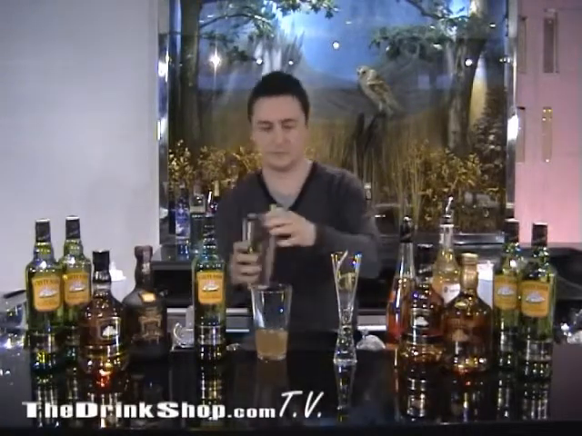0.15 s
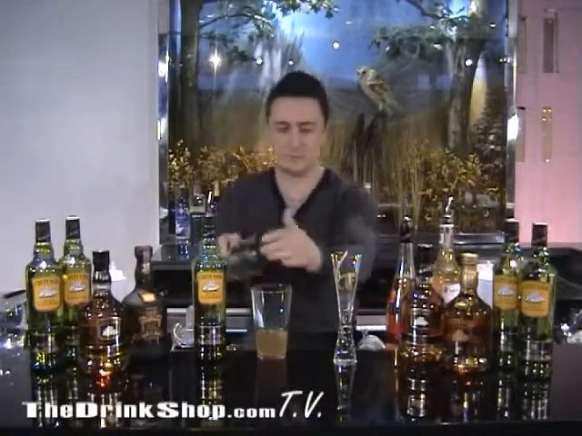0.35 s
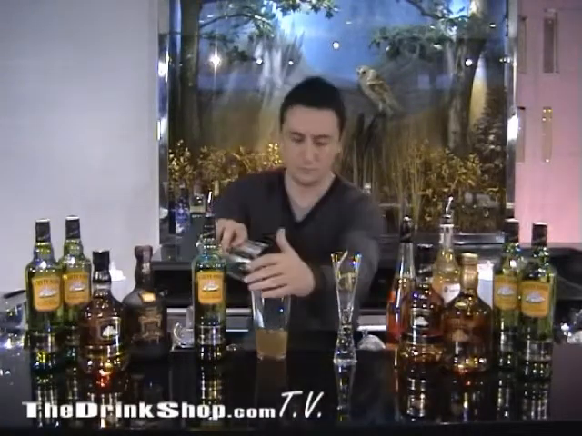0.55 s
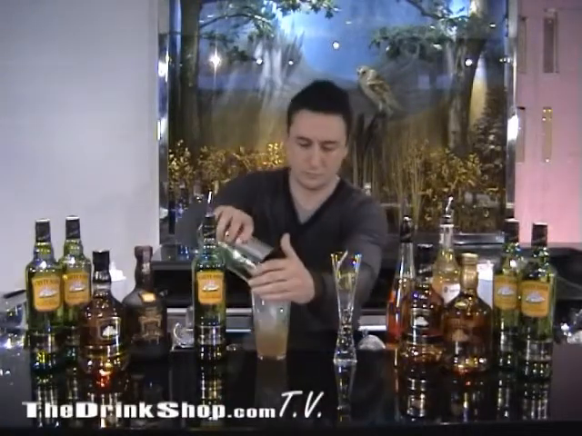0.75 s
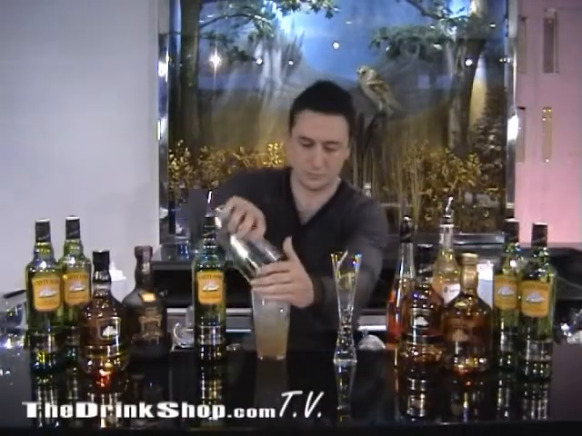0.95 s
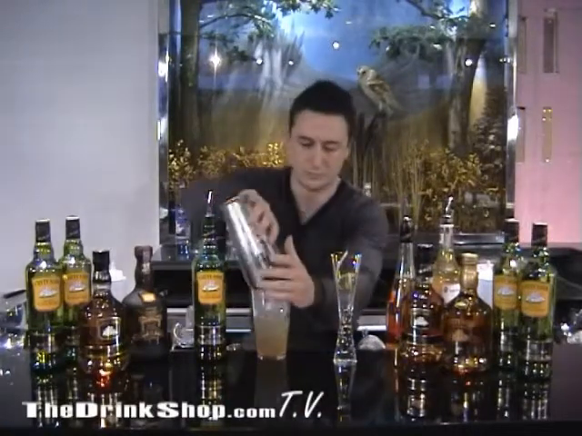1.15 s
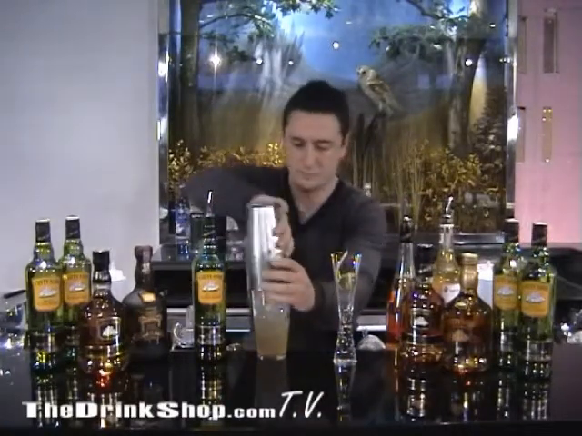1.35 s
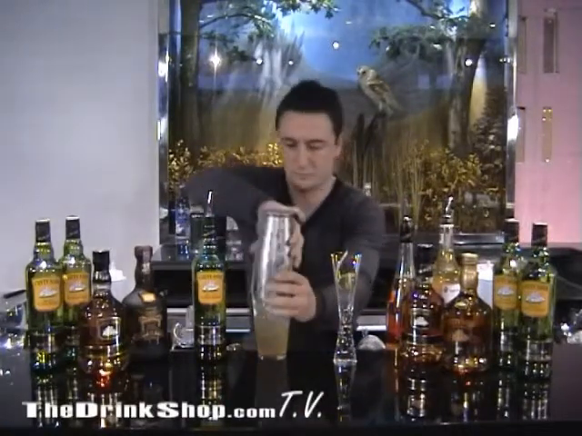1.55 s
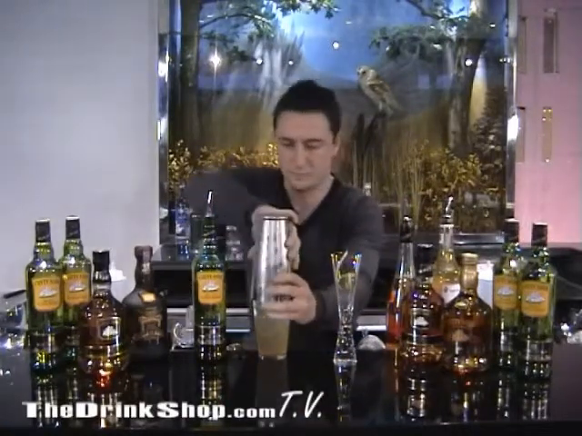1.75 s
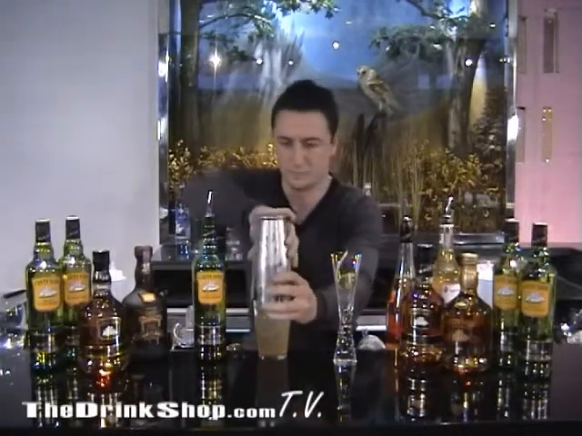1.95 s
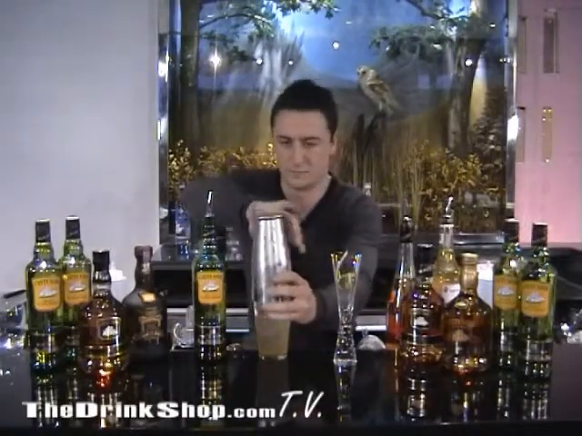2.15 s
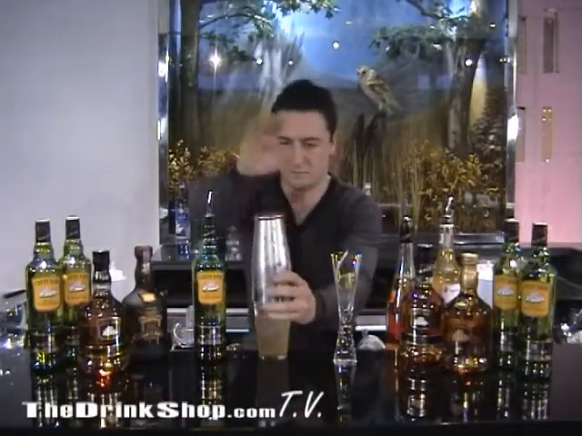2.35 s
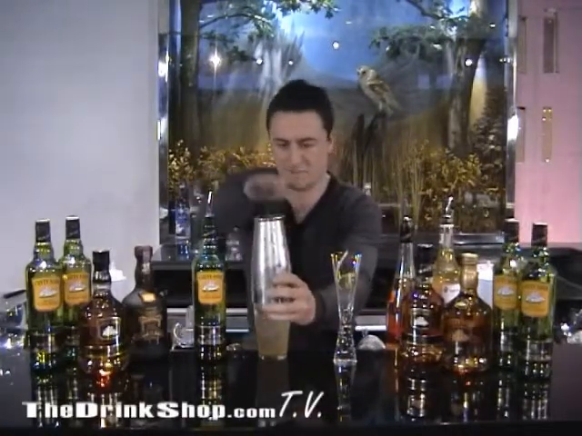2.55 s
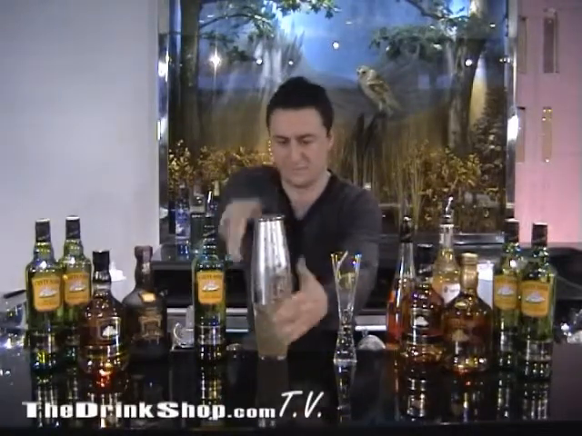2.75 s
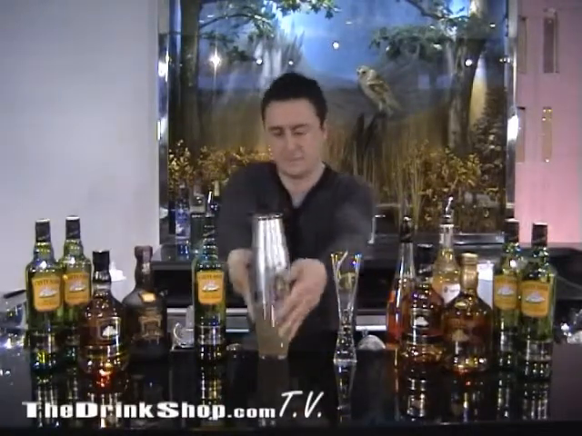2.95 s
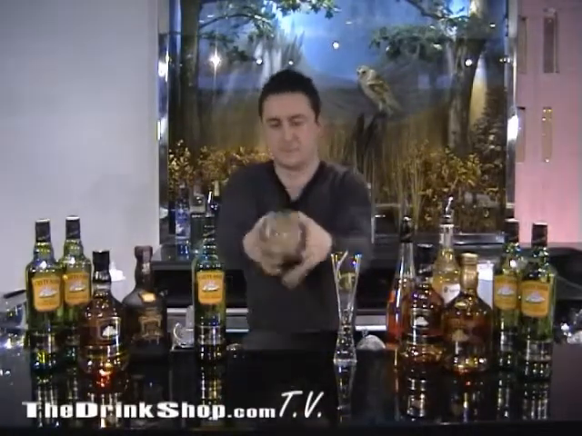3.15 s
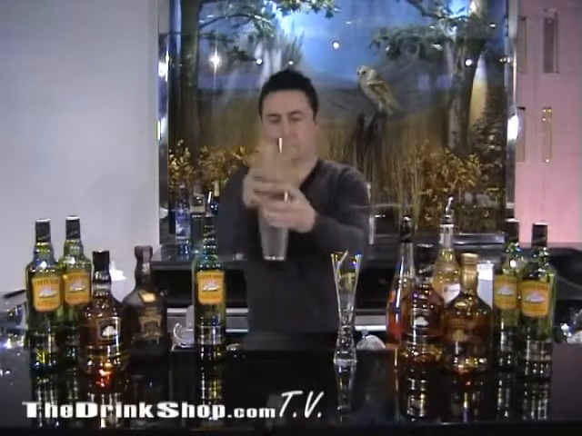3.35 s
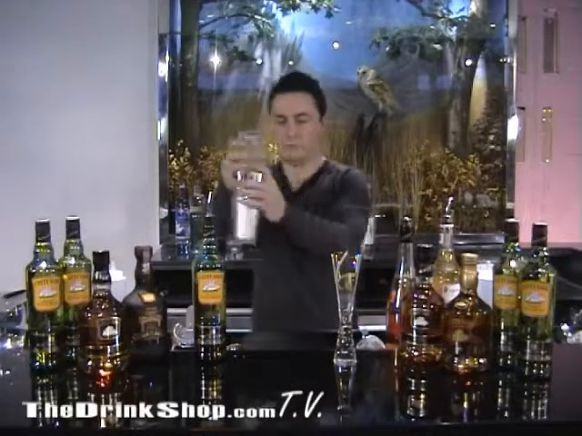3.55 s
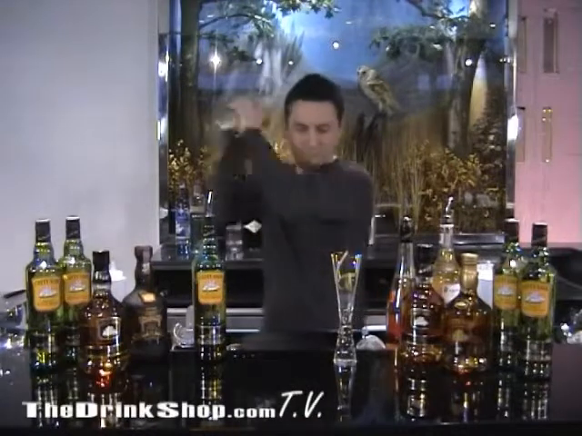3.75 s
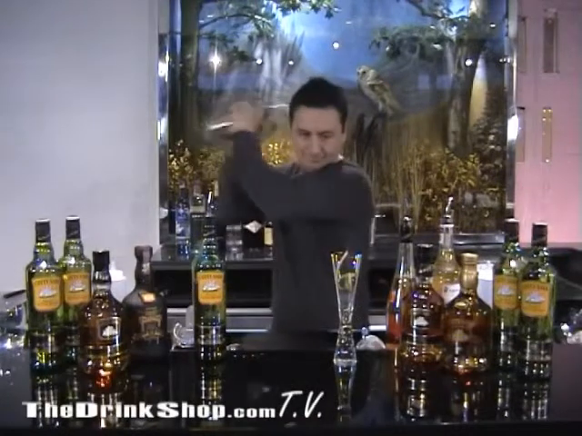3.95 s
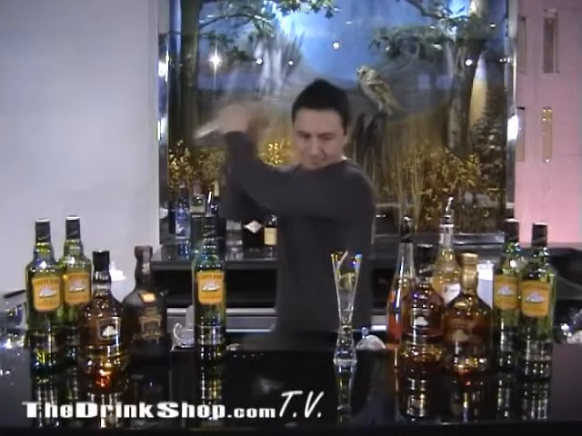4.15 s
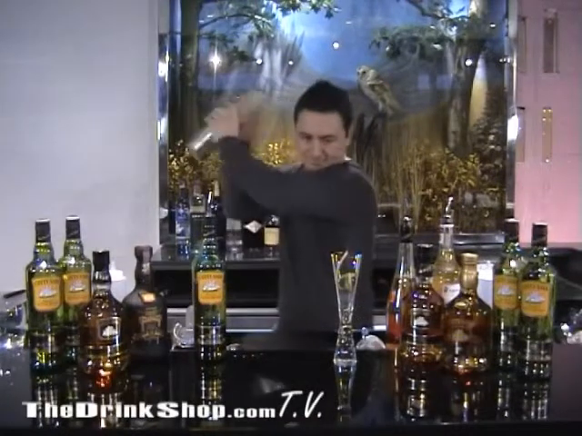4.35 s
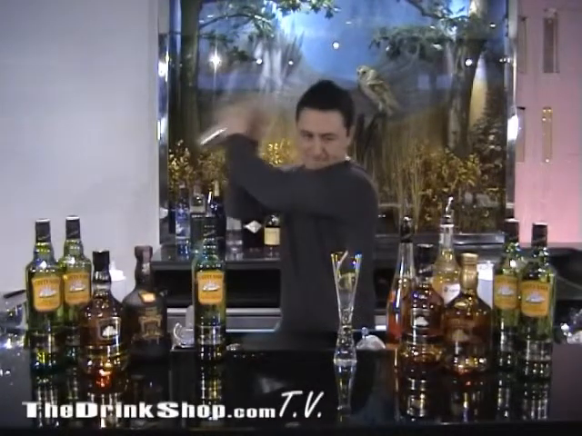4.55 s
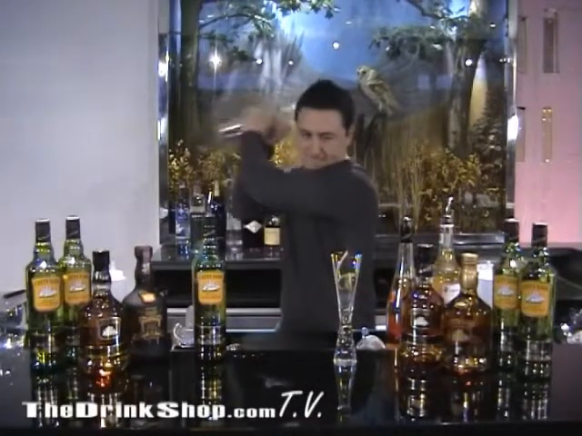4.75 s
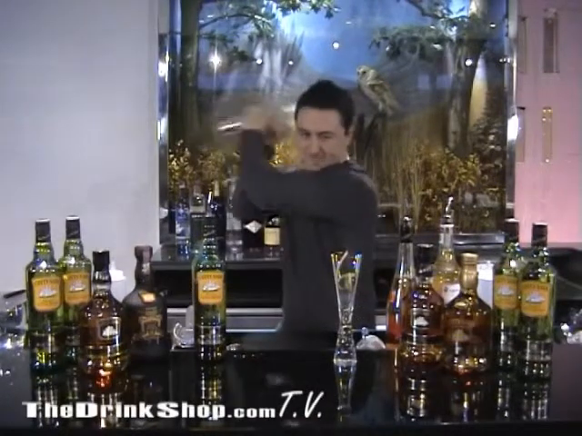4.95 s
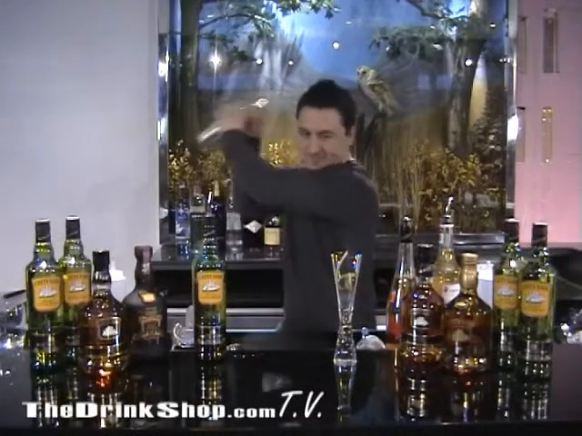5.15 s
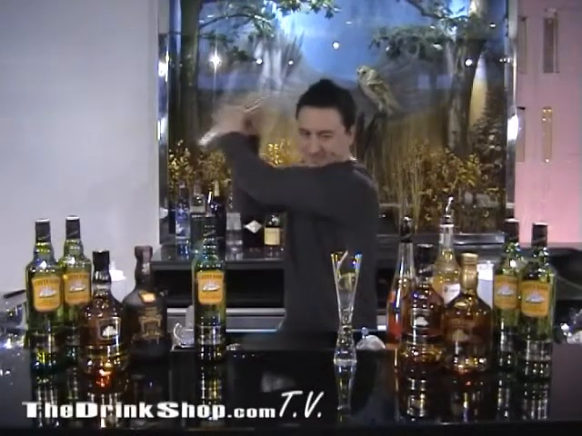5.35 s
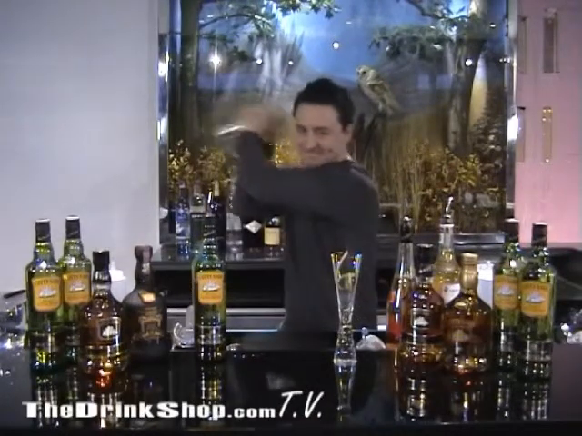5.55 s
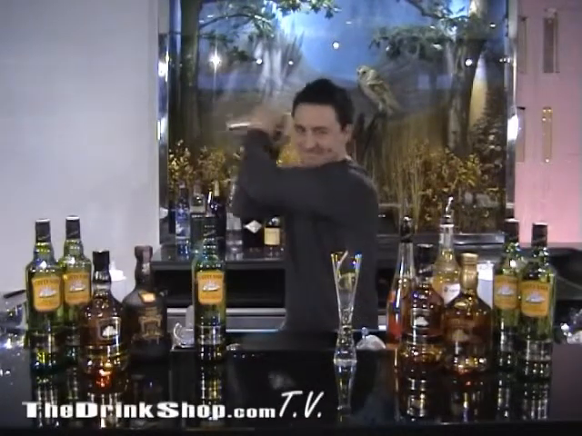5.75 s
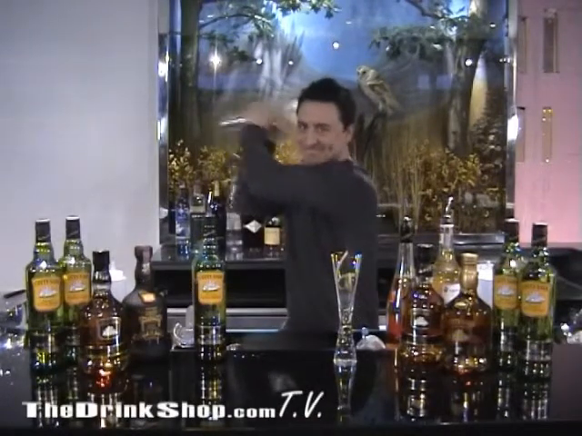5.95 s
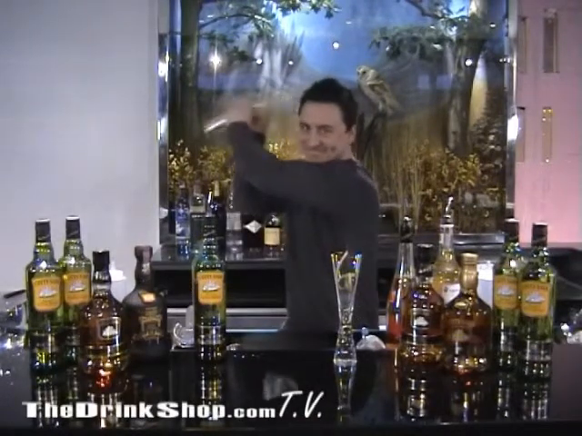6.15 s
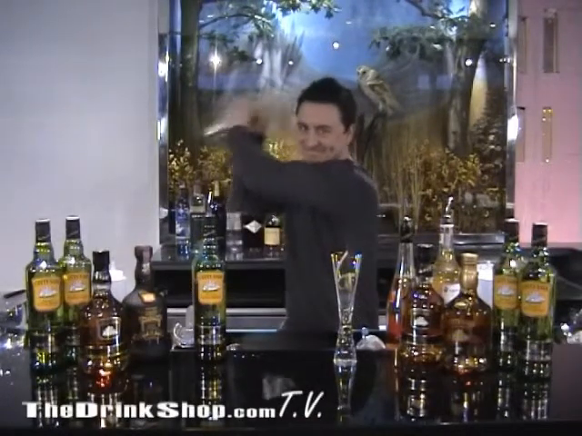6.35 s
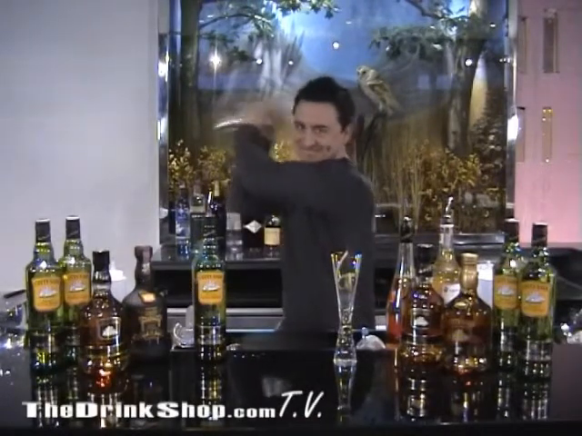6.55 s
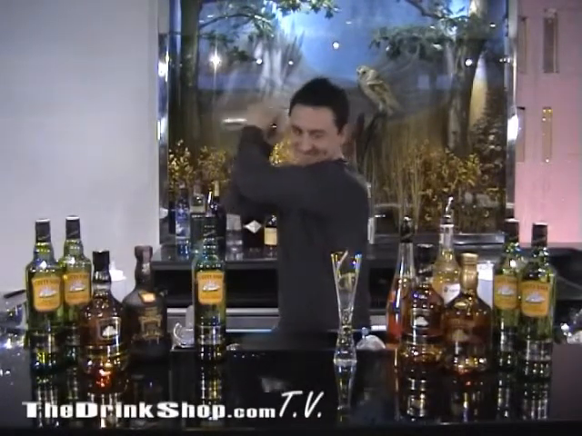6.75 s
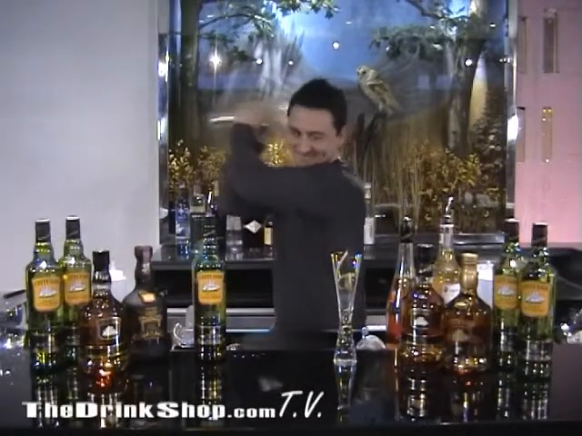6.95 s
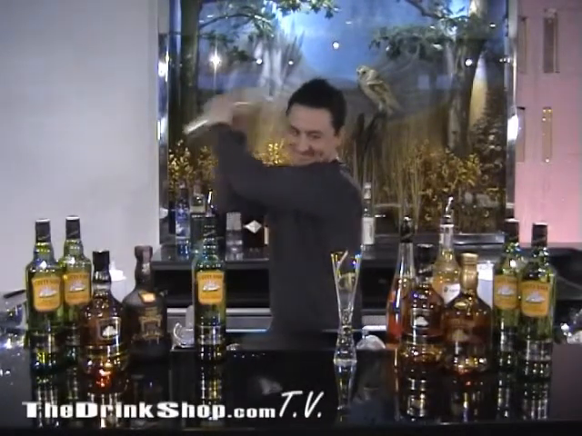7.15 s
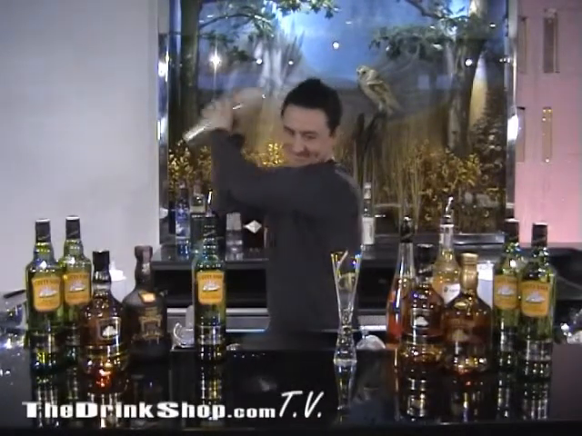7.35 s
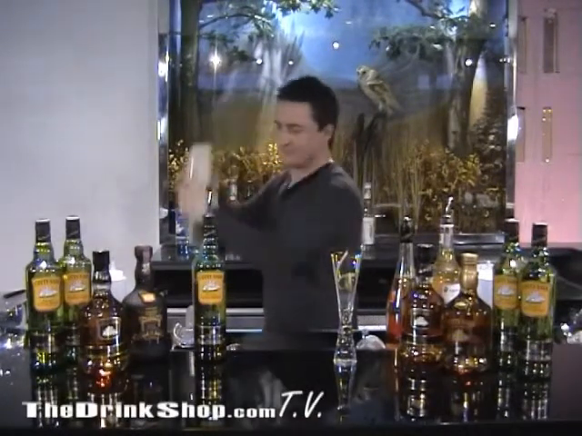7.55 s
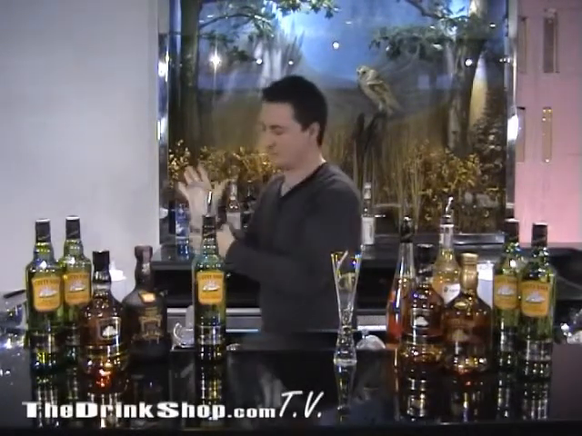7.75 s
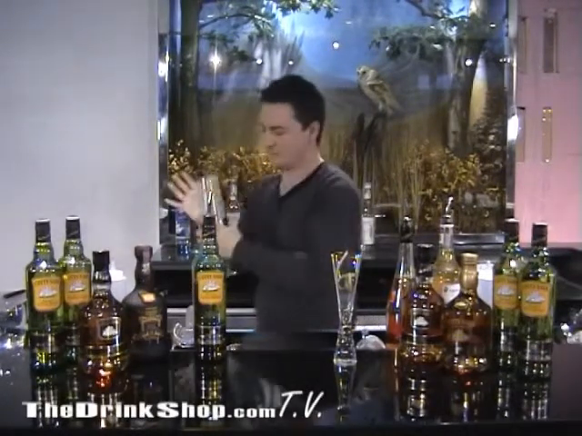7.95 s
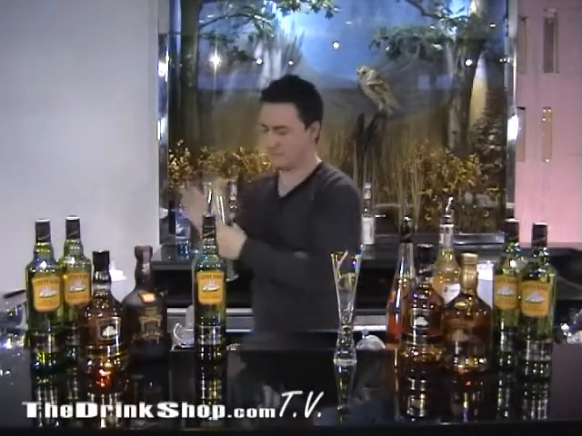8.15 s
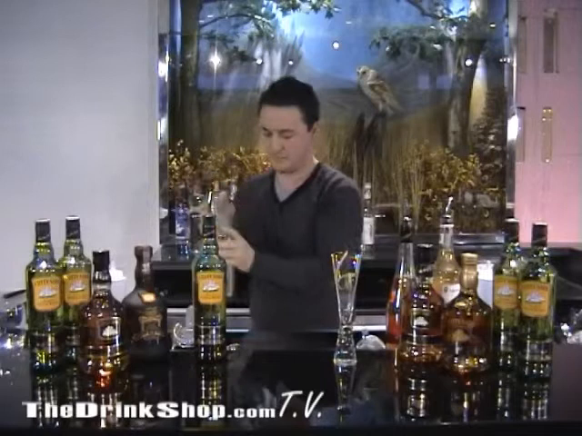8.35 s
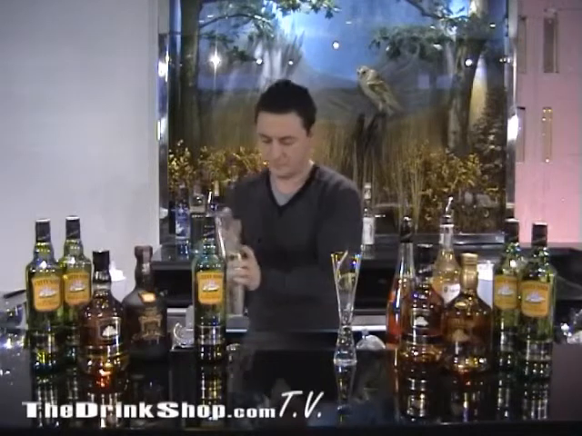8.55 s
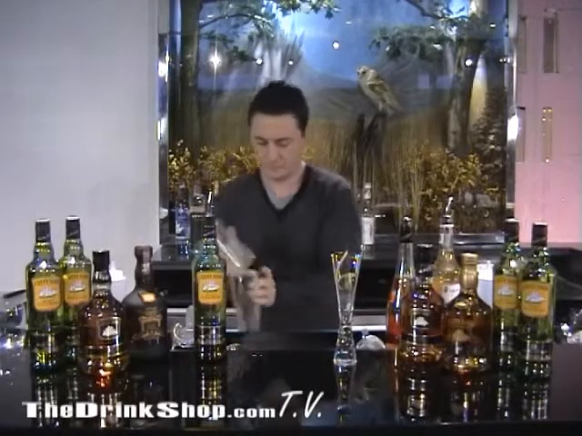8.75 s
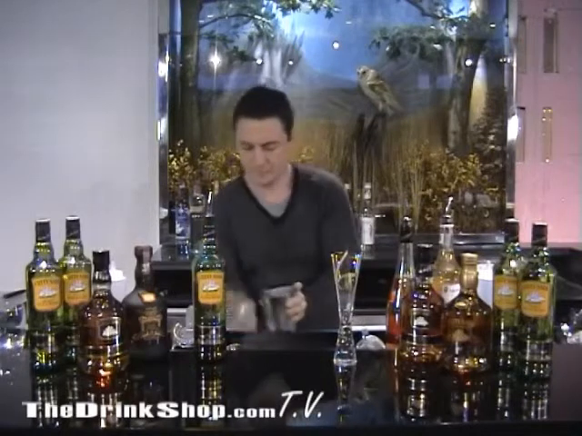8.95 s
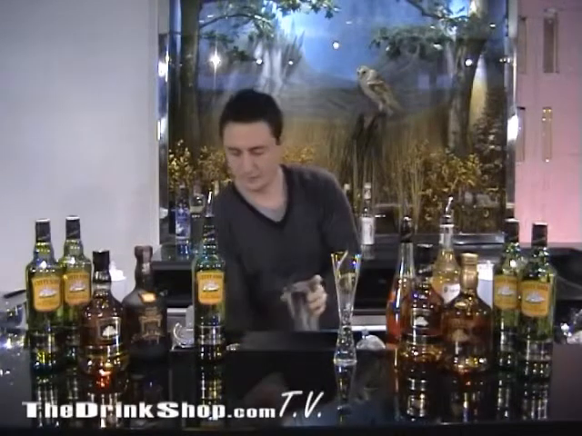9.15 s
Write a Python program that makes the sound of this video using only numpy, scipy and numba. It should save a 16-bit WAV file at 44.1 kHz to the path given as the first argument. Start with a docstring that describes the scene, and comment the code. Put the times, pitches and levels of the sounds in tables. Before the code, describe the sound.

A low ventilation hum fills a bare, reverberant room, picked up closely in stereo. Faint metal scraping leads to light tin-on-glass taps from 0.26 s, with stronger knocks at 0.4 and 0.5. From 0.63 to 1.05 s ice slides out of the open tin in a bright, ringing clatter. Small rim ticks and a glassy touch come at 1.3-1.5, then near quiet until a hard, cracking palm knock at 2.46 booms in the counter. Soft glass bumps at 2.9 and tinkling cubes precede a clattering flip and liquid gulp at 3.4. From 3.9 to 7.4 s fast shaking runs about six strokes a second: crisp ice clacks, dense rattle, wet slosh and hollow metallic ring. A last gulp and rattle come at 7.6, a sharp slap at 7.83 and a softer one at 8.0. Dull handling bumps, faint rubbing and a ringing clink at 8.8 fade into room hum.

```python
"""A steel tin scrapes and knocks on a mixing glass, then a bartender slides ice out of it with a bright clatter.
He seats the tin on the glass, seals it with a knock of the palm and shakes six strokes a second: cubes clack,
the drink sloshes, the closed hollow rings. Slaps loosen the tin and it clinks as it is turned over.
Blows are noise bursts through resonant bodies; rattles and scrapes are crowds of random clicks; liquid, cloth
and ventilation are filtered noise. A bare, echoing room reaches two close-set microphones; the recorder rides the level."""
import sys
import numpy as np
from scipy import signal
from scipy.fft import rfft, irfft
from scipy.io import wavfile
from numba import njit

SR = 44100
rng = np.random.default_rng(int(sys.argv[2]) if len(sys.argv) > 2 else 0)


def master(y):
    """Save y as 16-bit WAV."""
    cut = np.clip(np.atleast_2d(y).T, -1, 1)
    pcm = np.round(cut * 32767)  # scale
    wavfile.write(sys.argv[1], SR, pcm.astype(np.int16))


N = 405719

# All levels in the tables are relative; each layer sets its own gain, and the recorder acts on the sum.

# Strokes landing the load. Each row: time in seconds, slosh in dB, force of the ice in dB, ring of the hollow in dB.
STROKES = [(3.911, -19.5, 3, 5), (4.09, -22.5, 0, 3.5), (4.25, -20.5, 4, 1), (4.421, -23.5, 2, 6),
           (4.584, -28, -2, 1.5), (4.755, -24.5, 1, 4), (4.918, -21, -0.5, -4.5), (5.075, -24, 2, 5.5),
           (5.24, -22.5, -0.5, 0), (5.395, -22, 0.5, 6), (5.559, -24.5, 2.5, -3), (5.742, -19.5, 2, 10),
           (5.907, -21.5, 1.5, -3), (6.072, -19, 2, 1), (6.234, -23.5, -2.5, 0.5), (6.402, -20, 1, -2),
           (6.573, -21.5, 1, 0), (6.739, -22.5, -1, 0), (6.902, -18.5, 0.0, 2), (7.074, -22, 3, -0.5),
           (7.243, -23, 1.5, -3), (7.401, -37, -5, -10)]
# The drink against the wall. Each row: frequency in Hz, level in dB.
SLOSH_BODY = [(40, -29), (140, -24), (350, -5), (650, 2), (1000, 11), (1400, 4.5), (2500, 6.5), (6000, -6),
              (15000, -87)]
# Clumps of cubes standing out of the rattle. Each row: time in seconds, level in dB, brightness in dB per octave,
# ring of the hollow in dB, middle note of the cubes in Hz.
CLACKS = [(3.309, -22, 1, -29, 7360), (3.374, -10, 0.5, -29, 7060), (3.391, -15, -1, -33, 4960),
          (3.399, -6.5, 3.5, -29, 4870), (3.421, -12, 2, -17, 7300), (3.432, -13, 3, -18, 7200),
          (3.464, -17, 2, -22, 6950), (3.484, -12, 2.5, -35, 4850), (3.496, -18, 2, -31, 4830),
          (3.528, -13.5, 3, -27, 5360), (3.565, -23, -1, -42, 4640), (3.59, -33, -2, -37, 4300),
          (3.734, -21, 5.5, -34, 11200), (3.751, -17.5, 1, -25.5, 10800), (3.778, -18.5, 2, -17.5, 4460),
          (3.793, -14.5, 6.5, -23, 4500), (3.812, -17.5, -1.5, -26, 3080), (3.833, -25, -3, -39, 2900),
          (3.91, -11, 3, -14.5, 9600), (3.994, -20, -2, -13, 4900), (4.065, -16, 2, -11.5, 3100),
          (4.095, -14, 3, -12, 5750), (4.222, -24, -3, -16, 6200), (4.25, -15, 3, -11.5, 8850),
          (4.333, -15, -1.5, -18, 6500), (4.367, -15, 0.5, -27, 3270), (4.422, -11.5, 3, -12.5, 3100),
          (4.502, -15.5, 0, -12.5, 5300), (4.531, -15, 0, -25, 3080), (4.556, -18, -1.5, -10.5, 3300),
          (4.584, -13.5, 3, -27, 4430), (4.629, -17.5, -1.5, -32, 5940), (4.699, -17, 0, -15, 3060),
          (4.744, -19, -2.5, -12.5, 3260), (4.83, -18, -2.5, -20, 6300), (4.87, -11, -1, -15, 5900),
          (4.918, -15, 2.5, -27, 3360), (5.027, -13.5, -1.5, -28, 4800), (5.078, -13.5, 1, -15, 3300),
          (5.215, -19, -2.5, -17, 4600), (5.239, -17.5, -1, -31, 4600), (5.327, -15, -2.5, -20, 4100),
          (5.366, -17.5, -2, -18, 5400), (5.411, -14.5, 2, -13.5, 3380), (5.532, -16.5, -1, -17.5, 8400),
          (5.572, -11, -2.5, -16, 2830), (5.6, -16.5, 3, -25, 2800), (5.695, -23, 2, -16.5, 2770),
          (5.747, -16, 2.5, -31, 3800), (5.864, -15.5, 4, -11.5, 3780), (5.904, -8.5, 1, -14, 4040),
          (6.03, -11.5, 3, -10.5, 5130), (6.2, -15.5, -3.5, -13, 2740), (6.233, -15, 0.5, -35, 9650),
          (6.376, -20, -4, -13, 3100), (6.403, -15.5, 2, -17, 4230), (6.495, -18.5, 0, -26, 5240),
          (6.535, -15.5, 2, -25, 4000), (6.577, -14.5, 1, -15, 4100), (6.64, -15, 2, -28, 4170),
          (6.69, -13, 1, -16, 3810), (6.74, -13, -4, -27, 4200), (6.859, -16, -1, -14.5, 3600),
          (6.9, -21.5, 7, -17, 2800), (7.023, -16.5, -2.5, -21, 3400), (7.073, -21, -1, -20, 4500),
          (7.124, -19.5, 0.5, -16.5, 3100), (7.209, -23, -3, -15, 4800), (7.245, -23, 4, -17, 4700),
          (7.278, -15, 0, -17.5, 5860), (7.315, -16.5, 9, -24, 5500), (7.386, -20, -1.5, -14, 5460),
          (7.575, -23, -0.5, -21, 7900), (7.609, -19, 3.5, -32, 3430), (7.707, -20, 3, -27, 3580)]
# Ice on the wall. Each row: frequency in Hz, level in dB.
ICE_BODY = [(30, -56), (150, -47), (450, -10), (1000, -7), (2300, 2.5), (3500, 3), (4700, 4.5), (6000, 5),
            (8000, -2), (10000, -6.5), (12500, -11), (15000, -30)]
# Resonances of struck ice and wall. Each row: nominal frequency in Hz, width in Hz, height in dB.
ICE_MODES = [(1006, 22, 7.5), (3090, 520, 5.5), (5170, 570, -3)]
# The closed hollow. Each row: frequency in Hz, level in dB.
HOLLOW_BODY = [(30, -61), (200, -34.5), (1100, -12.5), (1420, 1), (1650, 5), (1950, -4), (2250, -7),
               (2600, -8), (8000, -50)]
# Resonances of the hollow. Each row: nominal frequency in Hz, width in Hz, height in dB.
HOLLOW_MODES = [(1652, 24, 11.5), (1720, 100, 9.5), (1896, 170, 16)]
# Spells when the whole ice load moves: flip, lift, shake, stop, lowering, two slaps, last settling.
# Each row: start in seconds, hold in seconds, rattle in dB, boom of the hollow in dB.
RATTLES = [(3.385, 0.049, -24, -31.5), (3.48, 0.18, -32.5, -38.5), (3.79, 0.053, -19.5, -28.5),
           (3.88, 3.595, -24, -31), (7.595, 0.069, -22.5, -31), (7.75, 0.024, -26, -46),
           (7.83, 0.067, -25, -52), (8.0, 0.082, -33, -41), (8.35, 0.073, -47, -59)]
# The drink washing back as the shaker stops and lowers. Each row: start in seconds, hold in seconds, level in dB.
WASHES = [(7.40, 0.033, -42), (7.62, 0.03, -34.5), (7.752, 0.025, -27)]
# The washing drink. Each row: frequency in Hz, level in dB.
WASH_BODY = [(40, -36), (130, -5), (220, 1), (380, 0.5), (700, 6), (1100, 5.5), (2500, 7.5), (6000, -11),
             (15000, -65)]
# The drink gulping into the tin at each flip. Each row: time in seconds, level in dB.
GULPS = [(3.373, -10.5), (7.601, -15.5)]
# The gulp. Each row: frequency in Hz, level in dB.
GULP_BODY = [(100, -82), (700, -8), (1000, 12), (1180, 9), (1500, -6), (8000, -44)]
# Loose cubes tinkling as the shaker tilts. Each row: time in seconds, level in dB.
TINKLES = [(3.161, -44), (3.206, -45), (3.227, -41), (3.263, -33.5), (3.283, -33), (3.291, -25.5),
           (3.311, -25), (3.328, -34), (3.337, -19), (7.655, -26)]
# Resonances of the tinkle. Each row: frequency in Hz, width in Hz, height in dB.
TINKLE_MODES = [(1870, 110, 21.5), (2250, 120, -2), (3060, 190, 17.5), (3700, 140, 12.5)]
# Low thudding under the strokes. Each row: start in seconds, hold in seconds, level in dB.
ROCKING = [(5.02, 0.7, -55.5)]
# The low thudding. Each row: frequency in Hz, level in dB.
ROCKING_BODY = [(35, -19), (62, -13), (80, 11), (110, -15), (160, 11), (260, -53), (1000, -76)]

# Tin and glass touching in the hands. Each row: time in seconds, level in dB, brightness in dB per octave,
# favoured note in Hz.
CONTACTS = [(0.262, -18.5, 4.5, 3120), (0.269, -19, 2, 3100), (0.279, -33, 1, 4400), (0.324, -18, 4, 3000),
            (0.339, -28, -2, 2900), (0.355, -25, 9, 7300), (0.413, -3.5, 3.5, 3140),
            (0.417, -8.5, -1.5, 5400), (0.484, -5, 0, 3000), (0.493, -10.5, -2.5, 780),
            (0.505, -8.5, 0.5, 780), (0.551, -17, 3, 5400)]
# Tin against glass. Each row: frequency in Hz, level in dB.
CONTACT_BODY = [(50, -20), (100, -23), (300, 2), (750, 0), (1500, 1), (3000, -1), (5500, -3), (9000, -8),
                (15000, -27)]
# Resonances of tin against glass. Each row: frequency in Hz, width in Hz, height in dB.
CONTACT_MODES = [(770, 150, 5.5), (3050, 170, 6), (3980, 84, 6), (7350, 170, 0)]
# The tin scraping lightly in the hands. Each row: start in seconds, hold in seconds, level in dB.
SCRAPES = [(0.0, 0.044, -51.5), (0.175, 0.11, -46.5), (2.0, 0.034, -57), (2.24, 0.079, -57)]
# The scrape. Each row: frequency in Hz, level in dB.
SCRAPE_BODY = [(60, -18), (300, -11), (600, -1.5), (1200, 3), (2500, 11), (5000, 6.5), (8000, -5),
               (15000, -44)]
# Resonances of the scrape. Each row: frequency in Hz, width in Hz, height in dB.
SCRAPE_MODES = [(567, 34, 26), (3120, 200, -2)]
# Cubes striking the open tin as they slide out. Each row: time in seconds, level in dB,
# brightness in dB per octave, favoured note in Hz.
DROPS = [(0.633, -5.5, 3, 4470), (0.6591, -5, -1.5, 4400), (0.6748, -15, 0, 4350), (0.683, -11, 0, 5500),
         (0.6942, -7.5, -0.5, 1980), (0.7327, -9, 0.5, 7280), (0.7701, -12, -1, 7300),
         (0.781, -11, 4, 5370), (0.7935, -11.5, 1.5, 2010), (0.81, -8.5, -4, 870),
         (0.827, -15.5, 5.5, 7250), (0.8541, -12.5, 2, 4430), (0.865, -16, 2.5, 2030),
         (0.8944, -13.5, 0, 7300), (0.952, -16, -1, 7300), (0.9607, -12.5, -0.5, 4340),
         (1.03, -21, 0.5, 4350)]
# Ice tumbling between those cubes. Each row: time in seconds, level in dB.
TUMBLE = [(0.665, -51), (0.70, -30), (0.74, -27), (0.8, -24), (0.88, -30), (0.96, -33), (1.02, -47),
          (1.08, -71)]
# The open tin. Each row: frequency in Hz, level in dB.
TIN_BODY = [(100, -27), (250, -2.5), (800, -2), (1500, -6), (3000, -2), (6000, -9.5), (10000, -15.5),
            (15000, -35)]
# Resonances of the open tin. Each row: nominal frequency in Hz, width in Hz, height in dB.
TIN_MODES = [(840, 140, 8.5), (1295, 40, 10), (2000, 370, 12.5), (4360, 250, 15), (4390, 45, 7),
             (5360, 280, 11), (7230, 150, 17.5), (8100, 40, 15), (10940, 300, 11.5), (12200, 150, 11)]

# The rim ticking on the glass. Each row: time in seconds, level in dB, brightness in dB per octave,
# favoured note in Hz.
RIM_TICKS = [(1.294, -25, 0.5, 7460), (1.302, -26, 0, 4900), (1.345, -30.5, -4, 4860),
             (1.432, -28, -0.5, 4380)]
# The rim. Each row: frequency in Hz, level in dB.
RIM_BODY = [(100, -6), (350, 12.5), (1200, 6), (4000, 9), (7000, 1), (9500, -12), (15000, -32)]
# Resonances of the rim. Each row: frequency in Hz, width in Hz, height in dB.
RIM_MODES = [(756, 26, 11), (4430, 300, 3), (4860, 340, 8.8), (7400, 290, 16.5), (11100, 540, 20.6)]
# The tin coming down on the glass. Each row: time in seconds, level in dB, brightness in dB per octave.
SEATING = [(1.473, -25.5, -0.5), (1.477, -30, -2), (1.483, -19, 1), (1.545, -42, -1)]
# Resonances of the ringing glass. Each row: frequency in Hz, width in Hz, height in dB.
GLASS_MODES = [(807, 36, 15.5), (2080, 45, 8.3), (2230, 40, 10.5), (2870, 50, 12), (2950, 51, 16),
               (3770, 41, 6), (4270, 85, 8.3), (4530, 66, 14), (5200, 360, 5), (7550, 110, 8.6),
               (9100, 70, 7), (9890, 50, 7)]
# The hand on the tin, once lightly, then hard. Each row: time in seconds, level in dB, brightness in dB per octave.
KNOCKS = [(1.830, -40, -0.5), (2.459, -11, 3.5), (2.462, -6, 4), (2.466, -13, -0.5), (2.469, -9, 3.5),
          (2.473, -13, 5)]
# The knocked tin. Each row: frequency in Hz, level in dB.
KNOCK_BODY = [(30, -27), (75, -3), (120, -1), (230, 7), (340, 5.5), (560, 4), (700, 9), (1000, 1),
              (1400, 5), (1900, 4), (3500, -5.5), (6000, -15.5), (10000, -22), (15000, -42)]
# The rim biting on the glass under the palm. Each row: time in seconds, level in dB, brightness in dB per octave.
SEAL_CRACKS = [(2.459, -10, 5), (2.469, -11, -3)]
# The counter booming under the sealing blow. Each row: time in seconds, level in dB.
THUMPS = [(2.463, -12.5)]
# The counter. Each row: frequency in Hz, level in dB.
THUMP_BODY = [(50, -24), (110, -10.5), (240, 0.5), (330, -1), (420, -1.5), (700, -1.5), (1200, 0),
              (2500, -11), (4000, -13), (5500, -9.5), (15000, -46)]
# Resonances of the counter. Each row: frequency in Hz, width in Hz, height in dB.
THUMP_MODES = [(221, 18, 1), (326, 18, 0), (435, 16, 3.5), (674, 22, 8)]
# The gripped glass rocking on the counter. Each row: time in seconds, level in dB.
ROCKS = [(2.851, -26), (2.905, -22.5), (2.917, -25.5)]
# The rocking glass. Each row: frequency in Hz, level in dB.
ROCK_BODY = [(60, -16), (200, -3), (450, 6), (700, 10), (1100, 0), (2000, 1.5), (3500, -7), (5000, -24),
             (15000, -46)]

# The heel of the hand slapping the tin, jolting the ice. Each row: time in seconds, level in dB,
# brightness in dB per octave.
SLAPS = [(7.828, -3, 2), (7.841, -17, -3.5), (8.007, -15, 2), (8.021, -13, -1.5), (8.033, -18.5, 10),
         (8.057, -31, -4), (8.143, -32, 1.5)]
# The slapped tin. Each row: frequency in Hz, level in dB.
SLAP_BODY = [(60, -14), (120, -1), (190, 2), (400, -6.5), (1200, 6), (3000, 7.5), (5300, 10), (8000, 5),
             (10000, -7.5), (15000, -25)]
# The tin clinking as it is turned upright. Each row: time in seconds, level in dB, brightness in dB per octave,
# favoured note in Hz.
CLINKS = [(8.800, -26.5, 1, 1956), (8.897, -41, 1.5, 4300), (8.908, -41, 2, 5700), (8.93, -49, 0, 4220),
          (8.962, -49, 12, 8100)]
# Resonances of the clink. Each row: frequency in Hz, width in Hz, height in dB.
CLINK_MODES = [(843, 26, 20.4), (1310, 70, 14), (1945, 22, 19), (2070, 55, 24), (2840, 55, 8.6),
               (4200, 50, 19), (4500, 340, 10), (5660, 62, 21), (7085, 45, 20), (7600, 70, 18)]
# The tin rubbing on the glass as it turns over. Each row: start in seconds, hold in seconds, level in dB.
RUBS = [(8.66, 0.07, -49), (8.9, 0.02, -52)]
# Resonances of the rub. Each row: frequency in Hz, width in Hz, height in dB.
RUB_MODES = [(2085, 44, 21.5), (2840, 72, 4), (4220, 90, 12), (7130, 70, 15)]
# Dull bumps of the shaker in the hands. Each row: time in seconds, level in dB.
BUMPS = [(3.175, -42.5), (8.467, -35.5), (8.495, -42), (8.60, -49), (8.705, -37), (8.99, -56)]
# The bumped shaker. Each row: frequency in Hz, level in dB.
BUMP_BODY = [(50, -9), (180, 2), (320, 2), (480, 5.5), (750, -4), (1300, -5), (3000, -16), (6000, -36),
             (15000, -61)]
# Resonances of the bump. Each row: frequency in Hz, width in Hz, height in dB.
BUMP_MODES = [(222.6, 16, 13), (340, 40, 11)]

# Sleeves and palms brushing as the grip changes. Each row: start in seconds, hold in seconds, level in dB.
SWISHES = [(2.85, 0.044, -51.5), (8.3, 0.059, -61), (9.0, 0.18, -64)]
# Cloth and skin. Each row: frequency in Hz, level in dB.
SWISH_BODY = [(200, -30), (2000, -12), (5000, 4), (8000, 2), (12000, -4), (15000, -30)]
# Ventilation. Each row: frequency in Hz, level in dB.
AIR = [(15, -68), (25, -20.5), (207, -8), (363, -7.5), (404, -8), (558, -10), (691, -6.5), (790, -7),
       (1760, -13.5), (2300, -12.5), (3010, -19.5), (9770, -31), (15000, -48)]
# Humming resonances of the ventilation. Each row: frequency in Hz, width in Hz, height in dB.
HUM = [(97.5, 12, 9.5), (211, 29, 11), (488, 41, 9)]
# The room. Each row: frequency in Hz, reverberation time in seconds, echo level in dB,
# difference between left and right in dB against their common part.
ROOM = [(100, 2.3, -2, 0), (229, 0.94, 9, -21), (685, 0.79, 5.5, -11), (2050, 0.76, 4, -8),
        (3700, 0.8, 0.5, -10), (7900, 0.55, -1, -9), (14000, 0.36, -0.5, -4)]

# A loose cube: middle note, spread from cube to cube in octaves, width and height of the note.
CUBE_HZ, CUBE_OCTAVES, CUBE_WIDTH_HZ, CUBE_RING_DB = 5000, 0.605, 237, 11
# A clump of cubes: nominal landing time, fall per cube, random spread of level and of brightness (dB per octave).
CLUMP_S, CLUMP_FALL_DB, CUBE_SPREAD_DB, CUBE_SPREAD_TILT = 0.01, 2, 1, 0.52
# Uneven churning: time between random levels, and their spread.
CHURN_S, CHURN_DB = 0.03, 2.5
RATTLE_ATTACK_S, RATTLE_RELEASE_S = 0.018, 0.022
# The recorder's gain control and its top limit.
LIMIT_DB, LIMIT_RATIO, LIMIT_ATTACK_S, LIMIT_RELEASE_S = -23, 4.2, 0.0072, 0.097
TOP_HZ = 14500


def shaking():
    """The load lands on every stroke; cubes clack and rattle, and the closed hollow booms."""
    flip = blows(GULPS, GULP_BODY, (), chatter_s=0.0025, snap=0.52, gain_db=12.5)
    flip += blows(TINKLES, ICE_BODY, TINKLE_MODES, chatter_s=0.0035, snap=0.22, gain_db=22.0)
    clacks = blows(clumps(), ICE_BODY, ICE_MODES, chatter_s=0.0036, snap=0.53, gain_db=18.0,
                   detune=0.067, note_width_hz=370, note_db=11.5)
    hollow_hits = [(s, ring_db) for s, _, _, ring_db, _ in CLACKS]
    hollow_rings = blows(hollow_hits, HOLLOW_BODY, HOLLOW_MODES, chatter_s=0.0057, snap=0.72,
                         gain_db=19.0, detune=0.018)
    rocking = swells(ROCKING, attack_s=0.08, release_s=0.14) * filtered_noise(body(ROCKING_BODY))
    ice = amp(-4.5) * ice_rattle() + amp(-3.5) * hollow_boom()
    moving = swung(drink() + ice + hollow_rings, wet_db=0.0, pan_db=0.9)
    return moving + place(clacks + flip, wet_db=-2.5, pan_db=2.0) + rocking


def drink():
    """Liquid slaps the wall on each stroke, then washes back as a swell of filtered noise."""
    landings = [row[:2] for row in STROKES]
    slosh = blows(landings, SLOSH_BODY, HOLLOW_MODES[:1], chatter_s=0.016, snap=0.035, gain_db=24)
    wash = swells(WASHES, attack_s=0.038, release_s=0.021) * filtered_noise(body(WASH_BODY))
    return slosh + wash


def ice_rattle():
    """Cubes, small chips and sparse sharp cracks rattle together, pulsing with the strokes."""
    cubes = churn(rate=240, spread_db=11.0, chatter_s=0.0032, tilt=-1.3)
    chips = churn(rate=260, spread_db=14, chatter_s=0.0011, tilt=3.6)
    cracks = churn(rate=28, spread_db=15, chatter_s=0.00031, tilt=0.41)
    rattle = unit(cubes + amp(-4.5) * chips + amp(-6.0) * cracks)
    spells = swells(RATTLES, RATTLE_ATTACK_S, RATTLE_RELEASE_S)
    return rattle * spells * surge(depth_db=-0.3, peak_turn=-0.059, axis=2)


def hollow_boom():
    """A dense crowd of collisions excites the resonances of the closed hollow."""
    boom = through(collisions(rate=400, spread_db=10.0, chatter_s=0.0004), body(HOLLOW_BODY, HOLLOW_MODES))
    spells = swells(RATTLES, RATTLE_ATTACK_S, RATTLE_RELEASE_S, axis=3)
    return boom * spells * surge(depth_db=0.5, peak_turn=-0.16, axis=3)


def clumps(count=3, note_octaves=0.19):
    """Each clack is a few cubes of like size landing in turn: rows of (s, level dB, brightness, note Hz)."""
    cubes = []
    for s, db, tilt, _, hz in CLACKS:
        for k, (hard, bright, small) in enumerate(rng.standard_normal((count, 3))):
            late = CLUMP_S * k / count * rng.uniform(.5, 1.5)
            level_db = db - CLUMP_FALL_DB * k + CUBE_SPREAD_DB * hard
            note_hz = hz * 2 ** (note_octaves * k * small)
            cubes.append((s + late, level_db, tilt + CUBE_SPREAD_TILT * bright, note_hz))
    return cubes


def churn(rate, spread_db, chatter_s, tilt, count=64):
    """Pieces of ice, each with its own short note, rattling on the wall in uneven bunches; rms 1."""
    levels_db = CHURN_DB * np.sqrt(3) * rng.uniform(-1, 1, size=1024)
    bunches_db = np.interp(np.arange(N) / SR / CHURN_S, np.arange(1024), levels_db)
    notes = CUBE_HZ * 2 ** (CUBE_OCTAVES * np.sqrt(3) * np.linspace(-1, 1, count))
    pieces = [body(ICE_BODY, ICE_MODES + [(hz, CUBE_WIDTH_HZ, CUBE_RING_DB)], tilt, size=2048) for hz in notes]
    return unit(amp(bunches_db) * collisions(rate, spread_db, chatter_s, bodies=pieces))


def surge(depth_db, peak_turn, axis):
    """The ice follows the force of the strokes and swells and thins once in each; unchanged outside the shake."""
    strokes, t = np.array(STROKES), np.arange(N) / SR
    turns = np.interp(t, strokes[:, 0], np.arange(len(strokes)))
    force_db = np.interp(t, strokes[:, 0], strokes[:, axis])
    db = force_db + depth_db * np.cos(2 * np.pi * (turns - peak_turn))
    during = (t > strokes[0, 0]) & (t < strokes[-1, 0])
    return amp(db * during)


def swung(x, wet_db, pan_db, count=4):
    """The shaker travels to and fro, so its sound reaches the room from one spot after another."""
    stroke_s = np.mean(np.diff([row[0] for row in STROKES]))
    spot = (count - 1) * np.abs((np.arange(N) / SR / stroke_s) % 2 - 1)
    # neighbouring spots crossfade at equal power
    shares = [np.sqrt(np.maximum(1 - np.abs(spot - k), 0)) for k in range(count)]
    return lean(x + amp(wet_db) * sum(echoes(x * share) for share in shares), pan_db)


def pouring():
    """The tin scrapes and knocks on the glass, then ice slides out of it and sets it ringing."""
    touches = blows(CONTACTS, CONTACT_BODY, CONTACT_MODES, chatter_s=0.0078, snap=0.15, gain_db=12.0,
                    note_width_hz=280, note_db=8.5)
    scraping = collisions(rate=370, spread_db=19, chatter_s=0.0097)
    scrape = swells(SCRAPES, attack_s=0.029, release_s=0.073) * through(scraping, body(SCRAPE_BODY, SCRAPE_MODES))
    cubes = blows(DROPS, TIN_BODY, TIN_MODES, chatter_s=0.003, snap=0.7, gain_db=13.5,
                  detune=0.008, note_width_hz=100, note_db=22)
    tumbling = collisions(rate=140, spread_db=5, chatter_s=0.0028)
    tumble = curve(TUMBLE) * through(tumbling, body(TIN_BODY, TIN_MODES, tilt=-0.96))
    return place(touches + scrape, wet_db=-2.0, pan_db=1.0) + place(cubes + tumble, wet_db=-3.0, pan_db=0.8)


def fitting():
    """The tin is fitted over the glass and the palm drives it home; the blow booms in the counter and the room."""
    rim = blows(RIM_TICKS, RIM_BODY, RIM_MODES, chatter_s=0.0034, snap=0.18, gain_db=22.0,
                note_width_hz=150, note_db=18)
    seating = blows(SEATING, CONTACT_BODY, GLASS_MODES, chatter_s=0.0063, snap=0.34, gain_db=19.5)
    knocks = blows(KNOCKS, KNOCK_BODY, (), chatter_s=0.0029, snap=0.046, gain_db=22.5)
    thump = blows(THUMPS, THUMP_BODY, THUMP_MODES, chatter_s=0.029, snap=0.018, gain_db=29)
    rocks = blows(ROCKS, ROCK_BODY, (), chatter_s=0.006, snap=0.13, gain_db=22.5)
    # the biting rim cracks straight at the microphones, centred and without echo
    crack = blows(SEAL_CRACKS, CONTACT_BODY, (), chatter_s=0.0053, snap=.1, gain_db=21.0)
    return (place(rim + seating, wet_db=-3.0, pan_db=1.0) + place(knocks, wet_db=1.5, pan_db=2.0)
            + place(thump, wet_db=3.5, pan_db=-2.5) + place(rocks, wet_db=-8, pan_db=0.5) + crack)


def opening():
    """Slaps loosen the seal; the shaker bumps in the hands, rubs and clinks as it is turned over."""
    slaps = blows(SLAPS, SLAP_BODY, (), chatter_s=0.0033, snap=0.19, gain_db=15.5)
    clinks = blows(CLINKS, TIN_BODY, CLINK_MODES, chatter_s=0.0049, snap=1.1, gain_db=25.0,
                   note_width_hz=14, note_db=34.5)
    rubbing = collisions(rate=340, spread_db=10, chatter_s=0.002)
    rub = swells(RUBS, attack_s=0.066, release_s=0.06) * through(rubbing, body(TIN_BODY, RUB_MODES))
    bumps = blows(BUMPS, BUMP_BODY, BUMP_MODES, chatter_s=0.073, snap=0.25, gain_db=31.5)
    return (place(slaps, wet_db=-1.0, pan_db=0.5) + place(clinks + rub, wet_db=-4.0, pan_db=2.0)
            + place(bumps, wet_db=-12, pan_db=-3.0))


def sleeves():
    """Cloth and skin brush with a soft, airy hiss."""
    hiss = swells(SWISHES, attack_s=0.037, release_s=0.13) * filtered_noise(body(SWISH_BODY))
    return place(hiss, wet_db=0, pan_db=2.0)


def background(side_db, air_db, pan_db):
    """Ventilation murmurs as steady filtered noise with a few humming resonances, partly unlike in left and right."""
    mid, side = (filtered_noise(body(AIR, HUM)) for _ in range(2))
    signs = np.array([[1], [-1]])
    return lean(amp(air_db) * (mid + amp(side_db) * side * signs), pan_db)


def room_response(build_s=0.00088, early_db=-4, early_s=0.0057):
    """Left and right echoes from one spot: an early burst, then a tail whose treble dies first."""
    size = 65536
    t = np.arange(size) / SR
    f = np.maximum(np.arange(size // 2 + 1) * SR / size, 1)
    hz, t60, db, side_db = np.transpose(ROOM)
    noise = rfft(rng.standard_normal((2, size)))
    swell = (1 - np.exp(-t / build_s)) * (1 + amp(early_db) * np.exp(-t / early_s))
    tail = 0
    for k, share in enumerate(np.eye(len(hz))):  # overlapping bands, one per row
        fade = swell * np.exp(-np.log(1000) * t / t60[k])
        band = irfft(noise * np.interp(np.log(f), np.log(hz), share))
        mid, side = band * fade / np.sqrt(np.sum(fade ** 2))
        tail = tail + amp(db[k]) * (mid + amp(side_db[k]) * side * np.array([[1], [-1]]))
    return tail


def echoes(x):
    """The room's answer, left and right, to a sound from a fresh spot."""
    return signal.fftconvolve(x[None].astype(np.float32), room_response().astype(np.float32), axes=1)[:, :N]


def lean(x, pan_db):
    """Left louder than right by pan_db; negative leans right."""
    return x * amp(np.array([[pan_db], [-pan_db]]) / 2)


def place(x, wet_db, pan_db):
    """Direct sound plus the echoes of its own spot; more echo sounds farther from the microphones."""
    return lean(x + amp(wet_db) * echoes(x), pan_db)


def contact(chatter_s, snap):
    """One touch of unit energy: a snap and chatter that dies away."""
    t = np.arange(int(min(6 * chatter_s + .002, .12) * SR)) / SR
    push = unit(rng.standard_normal(len(t)) * np.exp(-t / chatter_s))
    push[0] += snap * np.sqrt(len(t))
    return push / np.sqrt(np.sum(push ** 2))


def body(points, modes=(), tilt=0, size=8192):
    """Causal impulse response of unit energy: a smooth spectrum with resonances standing out of it."""
    f = np.maximum(np.arange(size // 2 + 1) * SR / size, 1)
    hz, db = np.transpose(points)
    peaks = 1 + sum(amp(2 * d) / (1 + (2 * (f - c) / w) ** 2) for c, w, d in modes)
    smooth_db = np.interp(np.log(f), np.log(hz), db) + tilt * np.log2(np.maximum(f, hz[0]))
    gain = amp(smooth_db) * np.sqrt(peaks)
    # folding the cepstrum gives minimum phase, so the ring starts at once
    cepstrum = irfft(np.log(gain))[:size // 2]
    cepstrum[1:] *= 2
    response = irfft(np.exp(rfft(cepstrum, size)))
    return response / np.sqrt(np.sum(response ** 2))


def blows(rows, points, modes, chatter_s, snap, gain_db, detune=0,
          note_width_hz=CUBE_WIDTH_HZ, note_db=CUBE_RING_DB):
    """Every row strikes one body; it may tilt the brightness and favour a note, and detune shifts the modes."""
    out = np.zeros(N + SR)
    for s, db, *colour in rows:  # colour: brightness, then note, where given
        shift = 1 + detune * rng.standard_normal()
        rings = [(hz * shift, w, d) for hz, w, d in modes]
        rings += [(hz, note_width_hz, note_db) for hz in colour[1:]]
        sound = signal.fftconvolve(contact(chatter_s, snap), body(points, rings, *colour[:1]))
        start = int(s * SR)
        out[start:start + len(sound)] += amp(db + gain_db) * sound
    return out[:N]


def collisions(rate, spread_db, chatter_s, count=64, bodies=()):
    """Random collisions, rate per second, each a click drawn from a set, with rings if bodies are given; rms 1."""
    clicks = [contact(chatter_s, 0.9) for _ in range(count)]
    if bodies:
        clicks = [signal.fftconvolve(click, ring) for click, ring in zip(clicks, bodies)]
    chance = rng.random(size=(8192, 3))
    gaps_s = -np.log(1 - chance[:, 0]) / rate
    starts = (np.cumsum(gaps_s) * SR).astype(int)
    out = np.zeros(N + SR)
    for start, gain, which in zip(starts[starts < N], amp(spread_db * chance[:, 1]), chance[:, 2]):
        click = clicks[int(which * len(clicks))]
        out[start:start + len(click)] += gain * click
    return unit(out[:N])


def swells(rows, attack_s, release_s, axis=2):
    """Gain over time for spells of movement: each rises up to its start, holds, then dies away."""
    t = np.arange(0, N, 32) / SR
    power = 0
    for row in rows:
        start, hold = row[:2]
        outside = np.maximum(start - t, 0) / attack_s + np.maximum(t - start - hold, 0) / release_s
        power = power + (amp(row[axis]) * np.exp(-np.minimum(outside, 20))) ** 2
    return np.interp(np.arange(N) / SR, t, np.sqrt(power))


def curve(rows):
    """Gain over time from a column of dB; silent outside its span."""
    rows = np.array(rows)
    return amp(np.interp(np.arange(N) / SR, rows[:, 0], rows[:, 1], left=-120, right=-120))


def filtered_noise(response):
    """Steady noise coloured by a body; rms 1."""
    return unit(through(rng.standard_normal(N), response))


def through(x, response):
    """A sound passed through a body."""
    return signal.oaconvolve(x.astype(np.float32), response.astype(np.float32))[:N]


def unit(x):
    """The same sound at rms 1."""
    return x / np.sqrt(np.mean(x ** 2))


def amp(db):
    """Amplitude factor from dB."""
    return 10 ** (np.asarray(db) / 20)


@njit
def follow(wanted, attack, release):
    """Chases a value quickly upwards and slowly downwards."""
    out, now = np.empty(len(wanted)), 0.
    for i in range(len(wanted)):
        now += (wanted[i] - now) * (attack if wanted[i] > now else release)
        out[i] = now
    return out


def gain_control(x, window_s=0.0021):
    """Turns everything down while the sound is loud, so the room ducks under the shaking and swells back after it."""
    keep = np.exp(-1 / (window_s * SR))
    power = signal.lfilter([1 - keep], [1, -keep], np.mean(x ** 2, axis=0))
    over_db = np.maximum(10 * np.log10(power + 1e-12) - LIMIT_DB, 0)
    wanted_cut_db = over_db * (1 - 1 / LIMIT_RATIO)
    cut_db = follow(wanted_cut_db, 1 / (LIMIT_ATTACK_S * SR), 1 / (LIMIT_RELEASE_S * SR))
    return x * amp(-cut_db)


def scene():
    """The bartender's work at the counter, in front of the ventilation."""
    work = shaking() + pouring() + fitting() + opening() + sleeves()
    return work + background(side_db=-8.5, air_db=-47, pan_db=-2.5)


def record(dry):
    """The recorder sheds the deepest bass, rides the level, rounds the loudest peaks and cuts the top."""
    ceiling = .48
    low_cut = signal.butter(2, 42, "high", fs=SR, output="sos")
    top_cut = signal.ellip(8, .2, 70, TOP_HZ, fs=SR, output="sos")
    x = gain_control(signal.sosfilt(low_cut, dry))
    rounded = ceiling * np.tanh(x / ceiling)
    return signal.sosfilt(top_cut, rounded)


dry = scene()
out = record(dry)
master(out)
```